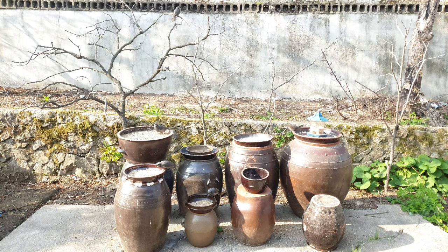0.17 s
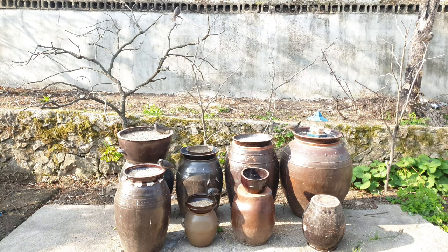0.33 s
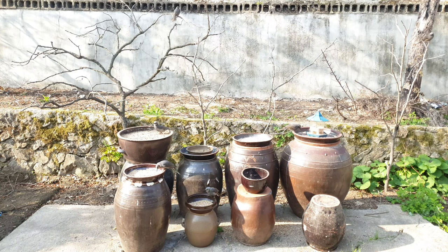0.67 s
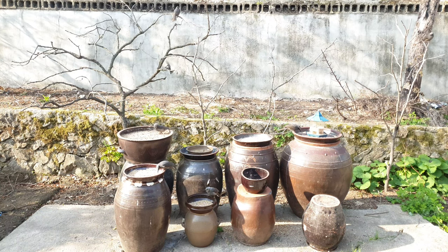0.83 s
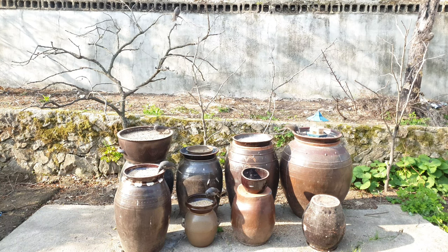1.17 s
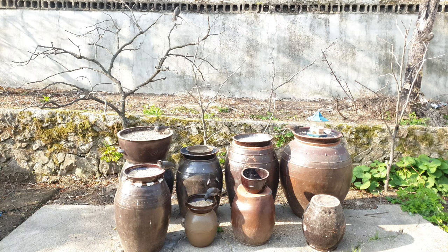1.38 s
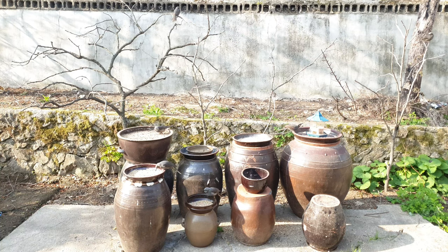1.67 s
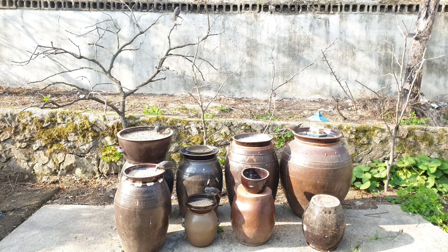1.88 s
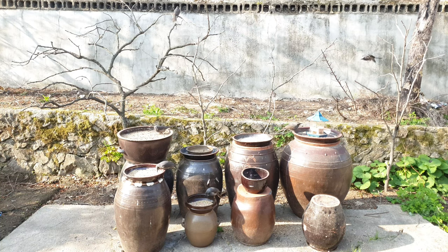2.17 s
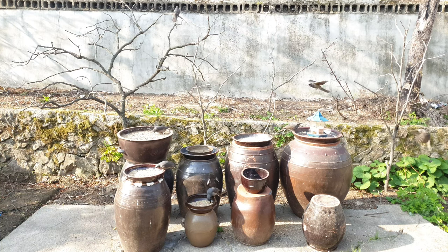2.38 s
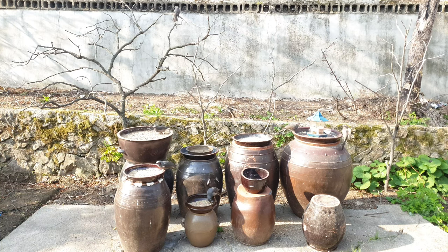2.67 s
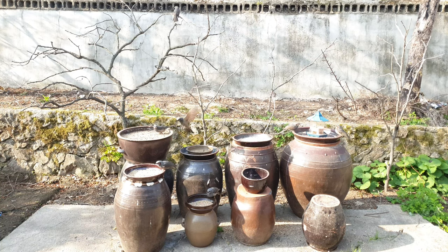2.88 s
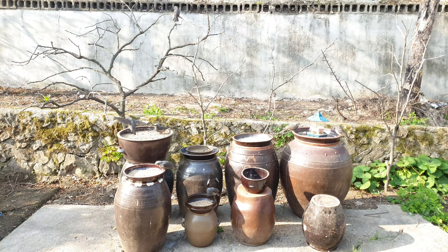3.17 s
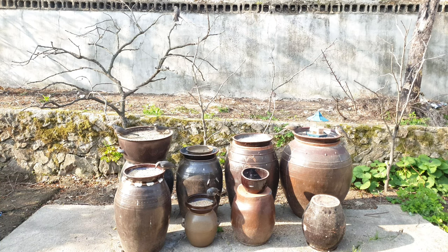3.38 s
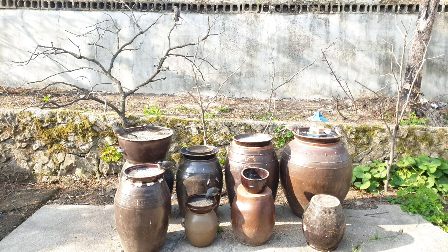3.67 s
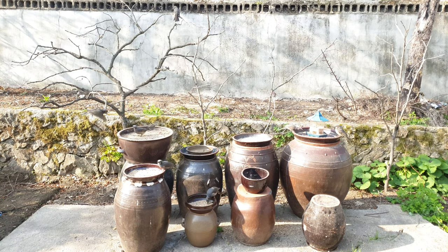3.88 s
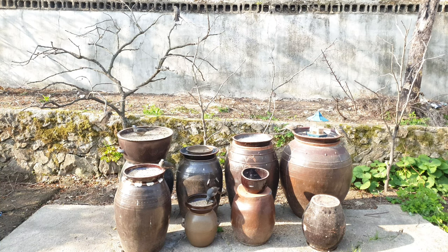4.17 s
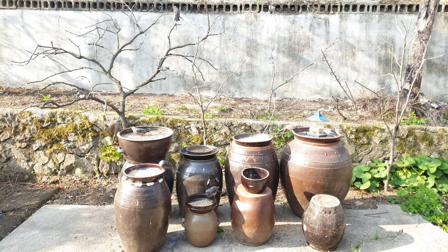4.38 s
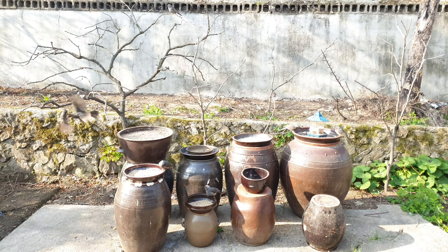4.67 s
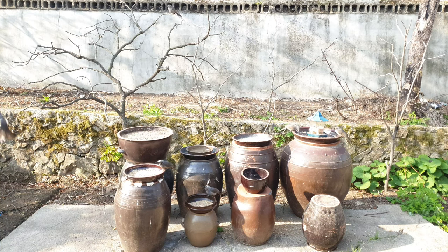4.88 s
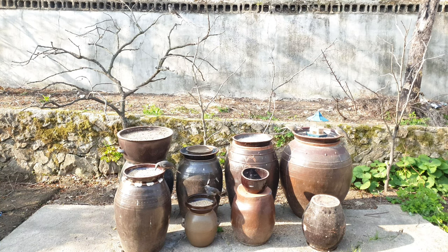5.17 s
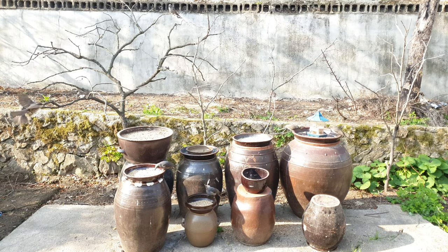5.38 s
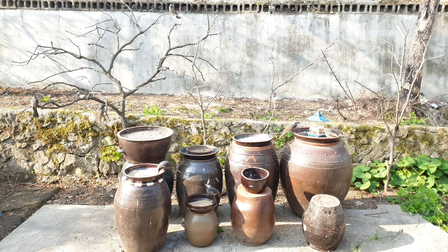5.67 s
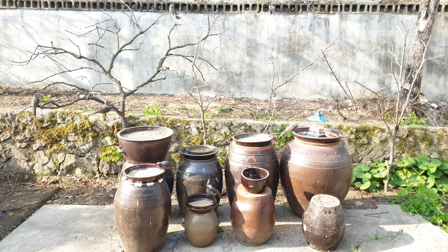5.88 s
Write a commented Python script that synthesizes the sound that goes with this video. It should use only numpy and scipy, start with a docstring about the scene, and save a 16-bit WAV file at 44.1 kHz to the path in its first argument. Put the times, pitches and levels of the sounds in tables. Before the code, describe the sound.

Small songbirds chirp and squeak in a walled yard over low traffic rumble, with a buzzing squabble and a crisp flurry of wingbeats.

```python
"""A walled yard: traffic rumbles throughout, with soft swishes (first to the right) and dry leaves on the left.
From the start distant birds answer as bare echoes; near ones follow with quick squeaks, two thin whistles
and the hollow whirr of flight, then arched chirps. Wings snap, a buzzing squabble with scolding notes ends in
a flurry of wingbeats; two squeaky glides and two last chirps follow, the first chirp faint. Notes are gliding
tones with harmonics, echoed by the walls; wings, air, leaves and the rest of the bed are shaped noise."""
import sys
import numpy as np
from scipy import signal
from scipy.fft import rfft, irfft, next_fast_len
from scipy.io import wavfile
from scipy.ndimage import map_coordinates

SR = 44100
rng = np.random.default_rng(int(sys.argv[2]) if len(sys.argv) > 2 else 0)


def master(y):
    """Save y as 16-bit WAV."""
    cut = np.clip(np.atleast_2d(y).T, -1, 1)
    pcm = np.round(cut * 32767)  # scale
    wavfile.write(sys.argv[1], SR, pcm.astype(np.int16))


N = 265834


def amp(db):
    """Decibels to gain."""
    return 10 ** (np.asarray(db) / 20)


def unit(x):
    """x at rms 1."""
    return x / np.sqrt(np.mean(x ** 2) + 1e-20)


def along(points, hz):
    """Read (frequency, value) points on a log frequency axis."""
    f, v = np.transpose(points)
    return np.interp(np.log(hz + 1), np.log(f + 1), v)


def curve(rows):
    """Join (time, value) rows into one value per sample."""
    return np.interp(np.arange(N) / SR, *np.transpose(rows))


def wobble(rate, size=N):
    """A smooth random curve, rate knots a second."""
    knots = rng.standard_normal(int(size * rate / SR) + 4)
    return map_coordinates(knots, [np.arange(size) * rate / SR])


def filtered(x, response):
    """Shape the spectrum of x by a complex response of frequency."""
    size = x.shape[-1]
    m = next_fast_len(size + 4096)  # spare room for delayed sound
    return irfft(rfft(x, m) * response(np.fft.rfftfreq(m, 1 / SR)), m)[..., :size]


def noise(colour, channels=2, size=N):
    """Independent coloured noises of overall rms 1."""
    white = rng.standard_normal((channels, size))
    return unit(filtered(white, lambda hz: amp(along(colour, hz))))


def placed(x, lag_ms, left_db):
    """A source at two microphones: the left hears it lag_ms later and left_db louder."""
    sides = np.array([[.5], [-.5]])
    return amp(left_db * sides) * filtered(x, lambda hz: np.exp(-2j * np.pi * hz * sides * lag_ms / 1000))


def add(track, s, x):
    """Mix x into the track at time s."""
    part = track[..., max(round(s * SR), 0):][..., :x.shape[-1]]
    part += x[..., :part.shape[-1]]


def swell(s, db, rise_s, fade_s):
    """Gain of a burst with its crest at s: up 20 dB in each rise_s, down 20 dB in each fade_s."""
    t = np.arange(N) / SR - s
    return amp(db - 20 * np.maximum(-t / rise_s, t / fade_s))


def together(gains):
    """Unrelated bursts add in power."""
    return np.linalg.norm(list(gains), axis=0)


# decay of the walls' tail, before the early boost: (frequency [Hz], time to fall 60 dB [s])
YARD_DECAY = [(200, 0.55), (2500, 0.31), (6000, 0.28), (12000, 0.2)]


def yard(x, early_db=0., early_s=0.35, clump_db=3.5):
    """The walls answer in an uneven, fading tail of clumped echoes, different at each microphone."""
    hz, t, z = signal.stft(rng.standard_normal((2, SR * 3 // 5)), SR, nperseg=256)
    decay = amp(-60 * t / along(YARD_DECAY, hz)[:, None])
    early = 1 + amp(early_db) * np.exp(-t / early_s)
    onset = 1 - np.exp(-t / 0.0018)
    tail = signal.istft(z * decay * early * onset, SR, nperseg=256)[1]
    tail = tail * amp(clump_db * wobble(900, tail.shape[1]))
    return signal.fftconvolve(x[None], tail / np.linalg.norm(tail[0]), axes=1)


TOP_HZ = 16200  # band limit
# hoarse partials at 1/2, 3/2 and 5/2 of the pitch: (level [dB, relative]) for each
HALF_PARTIALS = (-3, -1, -10)


def syrinx(length, crest, start_hz, crest_hz, end_hz, overtones_db, rough, rise=2.8, fall=1.8,
           jitter=0.052, swell_db=3.0, rasp_db=-9.5, split_db=-8.0, attack=0.18, release=0.056,
           trill=0., trill_hz=175.7, brighten_db=0.0):
    """One note: pitch glides through a crest as pressure builds; an unsteady membrane rasps and trills."""
    size = int(length * SR)
    u, crest = np.linspace(0, 1, size), np.clip(crest, .05, .95)  # u: place within the note
    before = np.maximum(1 - u / crest, 0)
    after = np.maximum((u - crest) / (1 - crest), 0)
    glide = crest_hz + (start_hz - crest_hz) * before ** rise + (end_hz - crest_hz) * after ** fall
    shake = jitter * wobble(905, size) + trill * np.sin(2 * np.pi * trill_hz * length * u)
    pitch = glide * (1 + rough * shake)
    phase = 2 * np.pi * np.cumsum(pitch) / SR
    upper = sum(amp(db) * np.sin(k * phase) * (k * pitch < TOP_HZ) for k, db in enumerate(overtones_db, 2))
    tone = np.sin(phase) + amp(brighten_db * (u - .5)) * upper  # overtones grow with the pressure
    # towards the end alternate cycles differ
    halves = sum(amp(db) * np.sin((k + .5) * phase) for k, db in enumerate(HALF_PARTIALS))
    rasp = 1 + rough * amp(rasp_db) * wobble(4200, size)
    tone = tone * rasp + rough * amp(split_db) * u ** 3 * halves
    edges = np.clip(u / attack, 0, 1) ** 2 * np.clip((1 - u) / release, 0, 1)
    pressure = edges * amp(swell_db * u) * amp(6 * rough * wobble(260, size))
    return np.sqrt(2) * tone * unit(pressure)


def overtones(pitch_hz, second_db, third_db, rolloff_db=-8.0):
    """Levels of harmonics 2 to 5: the throat passes little above the third, though deep notes keep more."""
    fall_db = rolloff_db * (pitch_hz / 3000) ** 2
    return [second_db, third_db, third_db + fall_db, third_db + 2 * fall_db]


# the windpipe rings at a quarter and three quarters of a wave: (frequency [Hz], gain [dB])
WINDPIPE_GAIN = [(1300, -4), (2700, 2), (3200, -0.5), (4500, -0.5), (6000, 0), (7300, 0), (8500, 1.5),
                 (9200, -3), (11000, -4.5), (14000, -18)]


def windpipe(note):
    """Each harmonic flares as it glides through a resonance of the windpipe."""
    return filtered(note, lambda hz: amp(along(WINDPIPE_GAIN, hz)))


def heard(s, note, lag_ms, wall_db, left_db):
    """A note sung at time s, with the answer of the walls."""
    out = np.zeros((2, N))
    add(out, s, placed(note, lag_ms, left_db))
    add(out, s, amp(wall_db) * placed(yard(note), 0, left_db))
    return out


# traffic before trims: (time [s], deep rumble level [dB], engine body level [dB])
TRAFFIC_LEVELS = [(0.0, -45.5, -35), (0.3, -47, -40.5), (0.48, -44.5, -37.5), (0.66, -48.5, -38),
                  (0.96, -44.5, -44), (1.14, -40.5, -35.5), (1.44, -44, -38.5), (1.98, -44.5, -42),
                  (2.1, -35, -38), (2.22, -43, -41.5), (2.94, -43, -35.5), (3.18, -36, -35.5),
                  (4.02, -37.5, -36.5), (4.44, -44, -39), (4.86, -35, -38), (4.92, -40, -39.5),
                  (5.64, -38.5, -41), (6.03, -33.5, -33)]
# colour of the deep rumble: (frequency [Hz], density [dB per Hz, relative])
DEEP_COLOUR = [(18, -50), (30, -11.5), (42, -4.5), (70, -2), (88, -2.5), (104, 2.5), (120, 1.5),
               (150, -29.5), (300, -77.5)]
# colour of the engine body: (frequency [Hz], density [dB per Hz, relative])
BODY_COLOUR = [(80, -31), (115, -21), (135, 3), (163, 1), (200, -3), (232, -13), (290, -7.5), (330, -16.5),
               (380, -19), (450, -28), (800, -45.5), (2000, -71.5)]


def traffic(deep_db=-1.0, body_db=-.5, hum_hz=104.8, hum_db=-4.5, spread_db=-12.0,
            deep_spread_db=-17.0, left_db=-2.0):
    """Far engines: a deep rumble with a wavering drone and a higher body, nearly alike at both microphones."""
    deep_gain, body_gain = (amp(curve(np.array(TRAFFIC_LEVELS)[:, [0, k]])) for k in (1, 2))
    hum = np.sin(2 * np.pi * np.cumsum(hum_hz + 3 * wobble(7)) / SR)
    drone = np.sqrt(2) * hum * unit(amp(3.2 * wobble(3.8)))
    deep = placed(noise(DEEP_COLOUR, channels=1)[0] + amp(hum_db) * drone, -0.0037, -2.8)
    deep = deep + amp(deep_spread_db) * noise(DEEP_COLOUR)
    body = placed(noise(BODY_COLOUR, channels=1), -0.18, left_db) + amp(spread_db) * noise(BODY_COLOUR)
    return amp(deep_db) * deep_gain * deep + amp(body_db) * body_gain * body


# swishes before trim: (crest time [s], level [dB], rise over 20 dB [s], fade over 20 dB [s])
SWISH_BURSTS = [(0, -58.5, .1, 0.3), (.69, -65.5, 0.088, 0.14), (1.33, -59, 0.12, 0.52),
                (2.551, -54.5, 0.24, 0.62), (3.08, -55, 0.21, 0.16), (3.8, -50, 1.08, 1),
                (3.977, -40, 0.06, 0.32), (4.7, -55, 1.9, 0.57), (5.271, -51, 0.086, 0.28)]
SWISH_REST_DB = -75.5  # floor between the swishes, before trim
# colour of a swish before the wall echo: (frequency [Hz], density [dB per Hz, relative])
SWISH_SPECTRUM = [(60, -6), (200, 7.5), (400, 4), (560, 5.5), (750, 6), (1000, 2), (1500, 0), (2100, -5),
                  (2700, -5), (3600, -13), (5000, -26), (8000, -45), (16000, -41.5)]


def swishes(gain_db=-1.0, diffuse_db=-2.0, lag_ms=0.45, left_db=4.0, flutter_db=1.3, echo_db=-3.5,
            comb_hz=91.76):
    """Fluttering swishes, first at the right but stronger at the left, combed by the nearest wall's echo."""
    rush = placed(noise(SWISH_SPECTRUM, channels=1), lag_ms, 0) + amp(diffuse_db) * noise(SWISH_SPECTRUM)

    def wall(hz):
        dull = 1 + (hz / 1500) ** 2  # the echo loses its treble
        return 1 + amp(echo_db) / dull * np.exp(-2j * np.pi * hz / comb_hz)

    rush = filtered(rush, wall)
    level = np.hypot(together(swell(*row) for row in SWISH_BURSTS), amp(SWISH_REST_DB))
    return level * amp(gain_db + flutter_db * wobble(55)) * placed(rush, 0, left_db)


# leaf rustles before trim: (crest time [s], level [dB], fade over 20 dB [s])
# a negative fade turns the burst round: slow to build, quick to drop
LEAF_BURSTS = [(0, -60, 1.5), (0.051, -49, -0.03), (0.681, -65.5, -0.93), (1.319, -74.5, 0.6),
               (2.97, -67, .5), (4.66, -52.5, 0.72), (5.3, -64, -1.2)]
RUSTLE_RISE = 0.43  # rise time over fade time
# colour of dry leaves: (frequency [Hz], density [dB per Hz, relative])
LEAF_SPECTRUM = [(800, -32), (2500, 2.5), (5000, 0), (8000, -1), (12000, 3.5), (16000, -4.5)]


def leaves(gain_db=-3.5, crackle_db=2.0, left_db=8.0):
    """Dry leaves rustle in tiny uneven crackles, some stirred quickly and slow to settle, some the reverse."""
    crackle = unit(amp(crackle_db * wobble(400) + 0.46 * wobble(32)))
    level = together(swell(s, db, RUSTLE_RISE * fade_s, fade_s) for s, db, fade_s in LEAF_BURSTS)
    return level * amp(gain_db) * placed(crackle * noise(LEAF_SPECTRUM), 0, left_db)


# calls from far off: (time [s], length [s], crest pitch [Hz], level [dB], sweep and roughness [ratio])
DISTANT_CALLS = [(0.166, 0.021, 4510, -64.5, 1), (0.19, .04, 6000, -63, 0.66),
                 (0.188, 0.033, 3120, -70, 0.52), (0.324, 0.037, 4740, -67, 0.43),
                 (.362, .055, 3010, -69, .45), (1.281, 0.037, 2000, -66.5, .9),
                 (1.296, .06, 4150, -74, 0.4), (1.33, .04, 5180, -74, .85), (1.388, 0.033, 6500, -75, .6),
                 (1.45, .1, 4570, -76.5, 1), (1.6, 0.085, 5160, -71, 1), (1.629, 0.055, 3590, -71, 0.7),
                 (1.695, 0.055, 6210, -71.5, 0.19), (2.297, 0.065, 4520, -72.5, 1.23),
                 (2.998, .075, 5220, -66.5, 0.98), (4.136, .046, 5330, -72.5, .65),
                 (5.635, 0.054, 5040, -71, 0.87)]


def far_birds(droop=0.26, left_db=3.5):
    """Distant chirps arrive only as echoes; the harsh ones sweep widest."""
    out = np.zeros((2, N))
    for s, length, hz, db, rough in DISTANT_CALLS:
        low = hz * (1 - droop * rough)
        note = amp(db) * syrinx(length, 0.5, low, hz, low, [-22], rough, swell_db=4.0,
                                jitter=.085, rasp_db=-10.)
        add(out, s, placed(yard(note), 0, left_db))
    return out


# squeaks and scolding notes, each with its own glide: (time [s], length [s], crest place [0-1],
# start [Hz], crest [Hz], end [Hz], level before the windpipe [dB], 2nd harmonic [dB], 3rd harmonic [dB],
# roughness [0-1], left lag [ms], wall echo [dB])
SCOLD_NOTES = [ (0.483, 0.011, .8, 4500, 6430, 6240, -64, -13, -35, 0, 0, 4),
               (.490, 0.013, .05, 5970, 5980, 4580, -62, -20, -34, 0.1, -0.024, 6.5),
               (1.415, 0.014, .1, 6420, 6300, 5650, -72, -25, -40, .15, 0, -6),
               (1.426, .022, 1, 2990, 4870, 4800, -75, -27, -40, 0.3, 0, 6),
               (4.229, 0.0221, 1, 1495, 2190, 2150, -57, -7, -12, 0.38, -0.097, 3.5),
               (4.238, 0.021, .95, 954, 1714, 1690, -57, 11.5, 7.5, 0.26, -0.16, 12.5),
               (4.515, .012, 0, 4500, 4540, 2600, -47.5, -16, -30, 0.4, -.12, 6),
               (4.530, .027, .3, 2754, 2632, 1910, -41, -7, -8.5, 0.76, -.12, -0.5),
               (4.531, 0.024, .25, 4510, 5290, 4100, -47, -18, -35, 0.5, -0.15, 0),
               (5.189, 0.032, .95, 1910, 2720, 2690, -64, 11, 10, 0, 0.28, -8),
               (5.203, 0.087, 0.79, 3620, 4860, 3910, -55, -32, -40, 0.15, 0.19, -7.5)]


def scolds(left_db=3.0):
    """Quick glides; the harsher the note, the more it rasps and trills."""
    out = np.zeros((2, N))
    for (s, length, crest, start_hz, hz, end_hz, db, second_db, third_db,
         rough, lag_ms, wall_db) in SCOLD_NOTES:
        note = syrinx(length, crest, start_hz, hz, end_hz, overtones(hz, second_db, third_db), rough,
                      rise=1.6, swell_db=5.0, jitter=.055, trill=0.05, rasp_db=-6.)
        out += heard(s, amp(db) * windpipe(unit(note)), lag_ms, wall_db, left_db)
    return out


# thin high whistles: (time [s], arch length [s], level [dB], 2nd harmonic [dB], wall echo [dB])
WHISTLE_NOTES = [(.853, 0.075, -55, -25, -3.5), (1.039, 0.065, -53.5, -19, -0.5)]
# pitch of the arch: (start [Hz], crest [Hz], end [Hz])
WHISTLE_ARCH = (5040, 7180, 6150)
# pitch of the short low note that closes a whistle: (start [Hz], crest [Hz], end [Hz])
WHISTLE_FOOT = (5250, 5730, 6040)


def whistles(foot_second_db=9.0, foot_s=0.019, foot_db=1.0, foot_wall_db=-1.0, left_db=4.5):
    """A nearly pure arch that brightens as it sinks and breaks to a short lower note at its end."""
    out = np.zeros((2, N))
    for s, length, db, second_db, wall_db in WHISTLE_NOTES:
        arch = syrinx(length, .45, *WHISTLE_ARCH, [second_db], rough=0.2, rise=1.3, fall=1.2,
                      swell_db=11.0, attack=0.32, brighten_db=21.5, split_db=-45.)
        foot = syrinx(foot_s, 0.74, *WHISTLE_FOOT, [second_db + foot_second_db], rough=0.19, attack=0.2)
        out += heard(s, amp(db) * arch, 0, wall_db, left_db)
        out += heard(s + length, amp(db + foot_db) * foot, 0, foot_wall_db, left_db)
    return out


# birds in flight before trim: (crest time [s], level [dB], rise and fade over 20 dB [s], pitch [ratio])
FLIGHTS = [(1.241, -56, 0.5, .95), (2.42, -53.5, 0.6, .88), (2.55, -49, 0.84, 1.06), (3.7, -56.5, 0.8, 1),
           (3.981, -32, 0.0154, 1), (4.068, -41, 0.27, 0.973)]
# colour of a flight at pitch ratio 1, before the echo: (frequency [Hz], density [dB per Hz, relative])
WHIRR_COLOUR = [(150, -25), (300, 15.5), (550, -1.5), (730, 9), (900, -13), (1300, -13.5), (2500, -35.5),
                (6000, -34.5)]


def whirr(gain_db=-1.5, beat_hz=25.75, beat_db=2.0, echo_db=-2.5, comb_hz=89.36, left_db=-0.5):
    """Wings churn the air with a hollow throb, pitched per flight and combed by the nearest wall's echo."""
    beat_phase = 2 * np.pi * np.cumsum(beat_hz + 2 * wobble(4.0)) / SR
    beats = unit(amp(beat_db * np.sin(beat_phase)))
    air, t = np.zeros((2, N)), np.arange(-SR, SR) / SR
    for s, db, fade_s, pitch in FLIGHTS:
        colour = [(hz * pitch, level) for hz, level in WHIRR_COLOUR]
        add(air, s + t[0], amp(db - 20 * abs(t) / fade_s) * noise(colour, size=len(t)))
    air = filtered(air, lambda hz: 1 + amp(echo_db) * np.exp(-2j * np.pi * hz / comb_hz))
    air = air / np.hypot(1, amp(echo_db))  # the echo adds no power overall
    return amp(gain_db) * placed(beats * air, 0, left_db)


# arched chirps: (time [s], length [s], crest [Hz], end [Hz], level before the windpipe [dB],
# 2nd harmonic [dB], 3rd harmonic [dB], roughness [0-1], left lag [ms], wall echo [dB])
CHIRP_NOTES = [ (2.122, 0.06, 3025, 2746, -56, -1.5, -9.5, 0.31, .09, 0),
               (2.699, .069, 3208, 2747, -49, -6.5, -17, 0.49, .40, -2.5),
               (3.098, 0.073, 3190, 2820, -52.5, -8, -32, 0.47, -.45, -2.5),
               (4.336, 0.078, 3037, 2596, -46, -5.5, -23, 0.6, .42, -3),
               (5.285, .056, 3190, 2777, -67, -5, -20, 0.74, 0, 9.5),
               (5.700, .067, 3070, 2540, -46.5, -7, -14.5, 0.48, .07, -3)]
CHIRP_START, CHIRP_CREST_AT = .83, 0.413  # start pitch over crest pitch, crest place 0-1
# opening flick: length [s], start and end over the chirp's crest pitch, level [dB re chirp], lead [s]
FLICK_S, FLICK_FROM, FLICK_TO, FLICK_DB, FLICK_LEAD_S = 0.013, .5, 1.1, -12, .011


def chirps(left_db=5.0):
    """Every chirp opens with a quick upward flick, then follows the same arch, growing hoarse as it sinks."""
    out = np.zeros((2, N))
    for s, length, hz, end_hz, db, second_db, third_db, rough, lag_ms, wall_db in CHIRP_NOTES:
        flick = syrinx(FLICK_S, 0.66, FLICK_FROM * hz, FLICK_TO * hz, FLICK_TO * hz, [-18], 2 * rough,
                       rise=0.58, swell_db=11.0)
        arch = syrinx(length, CHIRP_CREST_AT, CHIRP_START * hz, hz, end_hz,
                      overtones(hz, second_db, third_db), rough, rise=1.92, fall=1.596, swell_db=6.5,
                      attack=0.1, jitter=.055, trill=.04, rasp_db=-11., split_db=-9.)
        out += heard(s - FLICK_LEAD_S, amp(db + FLICK_DB) * flick, lag_ms, wall_db, left_db)
        out += heard(s, amp(db) * windpipe(arch), lag_ms, wall_db, left_db)
    return out


# wing strokes: (time [s], snap level before its lift [dB], feather level [dB], air push level [dB],
# treble tilt reached at 15 kHz [dB])
WING_STROKES = [(3.8012, -33.5, -48, -56, -12), (3.8678, -31, -56, -66, -5),
                (4.5955, -34.5, -46, -46.5, -2), (4.6110, -40, -51, -58, 0), (4.6266, -26.5, -42, -56, 0),
                (4.6855, -32, -46, -49.5, 0), (4.7252, -31, -48.5, -45.5, 0), (4.8480, -44, -47.5, -46, 0),
                (4.8765, -46, -54, -55, -1), (4.924, -50, -47, -47.5, -2), (4.952, -45, -58, -60, -2),
                (5.0095, -47, -59, -56, 0)]
# snap echoes off the nearest hard surfaces: (delay [s], level [dB])
HARD_ECHOES = [(.0075, -10.5), (.016, -19), (.039, -19)]
# colour of the feathers: (frequency [Hz], density [dB per Hz, relative])
FEATHER_COLOUR = [(500, -16), (1500, 1), (4000, 6.5), (7000, 2.5), (11000, 7), (16000, -3)]
# colour of the pushed air: (frequency [Hz], density [dB per Hz, relative])
PUSH_COLOUR = [(80, 0), (200, -2), (400, 2), (800, 1), (1800, -6), (4000, -15), (9000, -20.5)]


def wings(brush_peak_s=0.00485, push_peak_s=0.0085, snap_s=.0005, snap_lift_db=6., wall_db=-4.5,
          left_db=2.5):
    """Each stroke snaps the feather tips, brushes the vanes together and pushes a puff of air."""
    out, size = np.zeros((2, N)), SR // 8
    t = np.arange(size) / SR
    feathers, pushes = noise(FEATHER_COLOUR), noise(PUSH_COLOUR)

    def puff(peak_s):
        return t / peak_s * np.exp(1 - t / peak_s)

    snap = np.exp(-t / snap_s)
    for delay, db in HARD_ECHOES:
        snap = snap + amp(db) * (t > delay) * np.exp(-abs(t - delay) / snap_s)
    for i, (s, snap_db, feather_db, push_db, top_db) in enumerate(WING_STROKES):
        own = slice(i * size, (i + 1) * size)  # fresh noise for each stroke
        brush = puff(brush_peak_s) * amp(2.8 * wobble(610, size))
        stroke = (amp(snap_db + snap_lift_db) * snap + amp(feather_db) * brush) * feathers[:, own]
        stroke = filtered(stroke, lambda hz: amp(along([(6000, 0), (15000, top_db)], hz)))
        push = amp(push_db) * puff(push_peak_s) * pushes[:, own]
        stroke = placed(stroke + push, -0.1, left_db)
        add(out, s, stroke)
        add(out, s, amp(wall_db) * placed(yard(stroke[0]), 0, left_db))
    return out


# the loud buzz of the squabble, before trim: (time [s], pitch [Hz], level [dB])
BUZZ_GLIDE = [(4.400, 3950, -60), (4.418, 4100, -48), (4.433, 4290, -39), (4.463, 4490, -36),
              (4.497, 4600, -36.5), (4.506, 4760, -46), (4.517, 4720, -51)]
BUZZ_RATE_HZ, BUZZ_SWEEP_HZ, BUZZ_PULSE_DB = 128, 190, 6  # mean pulse rate, pitch and level swing (each +-)


def buzz(gain_db=2.0, second_db=-20.0, half_db=-20., uneven=.09, jitter=.027, rasp=.1, lag_ms=0.076,
         wall_db=-2.5, left_db=4.0):
    """A rising rasp chopped into fast uneven pulses, each a small sweep; a weak tone lies an octave below."""
    s, hz, db = np.transpose(BUZZ_GLIDE)
    t = np.arange(s[0], s[-1], 1 / SR)
    beat = 2 * np.pi * np.cumsum(BUZZ_RATE_HZ * (1 + uneven * wobble(90, len(t)))) / SR
    glide = np.interp(t, s, hz) * (1 + jitter * wobble(1100, len(t)))
    phase = 2 * np.pi * np.cumsum(glide - BUZZ_SWEEP_HZ * np.sin(beat)) / SR
    tone = np.sin(phase) * (1 + rasp * wobble(5000, len(t)))
    tone = tone + amp(second_db) * np.sin(2 * phase) + amp(half_db) * np.sin(phase / 2)
    pulses = unit(amp(BUZZ_PULSE_DB * np.cos(beat) + 3.2 * wobble(200, len(t))))
    level = amp(gain_db + np.interp(t, s, db))
    return heard(s[0], level * pulses * tone, lag_ms, wall_db, left_db)


# colour of the faint hiss: (frequency [Hz], density [dB per Hz, relative])
HISS_COLOUR = [(100, 2.5), (600, 21.5), (1200, 10.5), (2500, -15), (5000, -0.5), (8000, -24), (11500, 0.5),
               (16000, -2.5)]


def scene(hiss_db=-68.5):
    """Birds and yard over a faint steady hiss."""
    bed = traffic() + swishes() + leaves() + amp(hiss_db) * noise(HISS_COLOUR)
    birds = far_birds() + scolds() + whistles() + whirr() + chirps() + wings() + buzz()
    return bed + birds


def record(dry):
    """The recorder keeps nothing above its band limit."""
    return filtered(dry, lambda hz: hz < TOP_HZ)


dry = scene()
out = record(dry)
master(out)
```